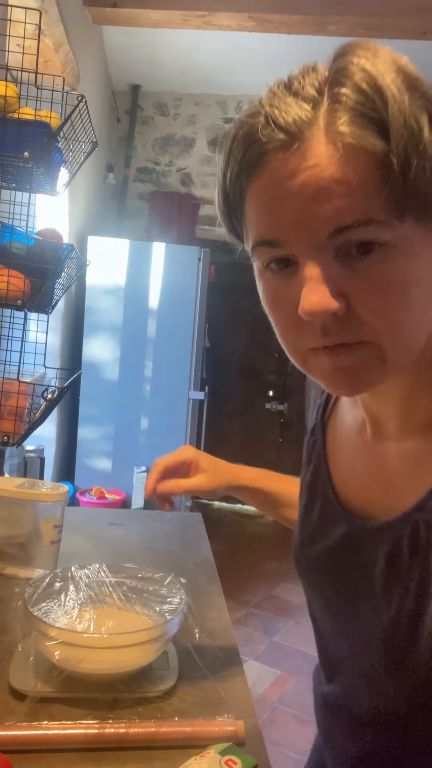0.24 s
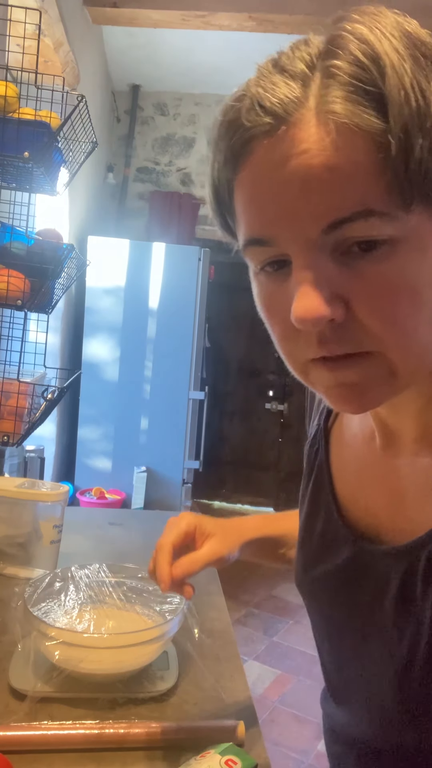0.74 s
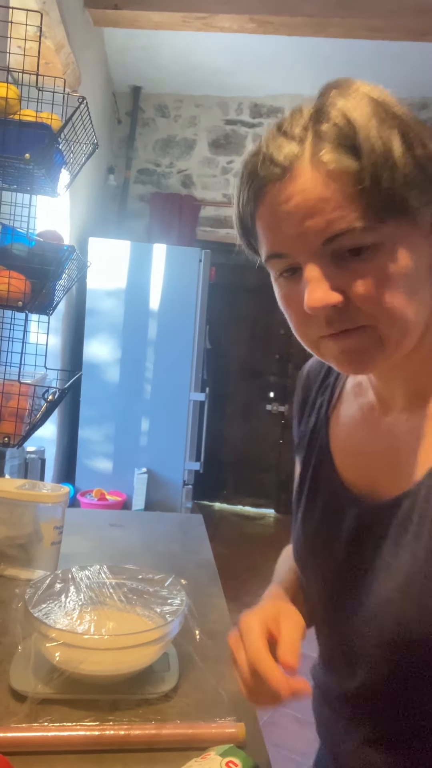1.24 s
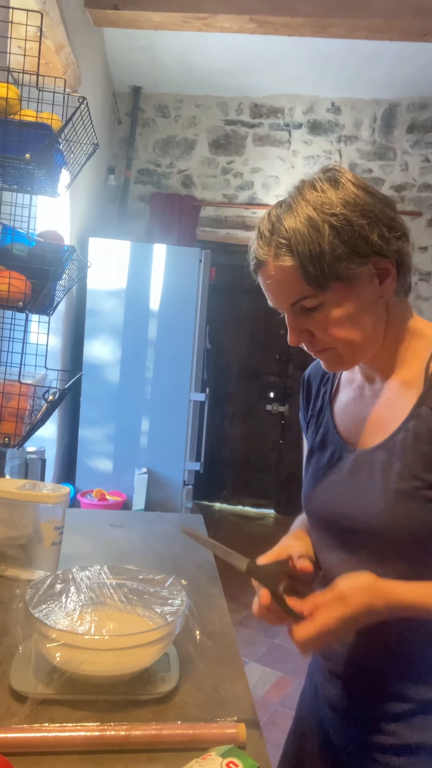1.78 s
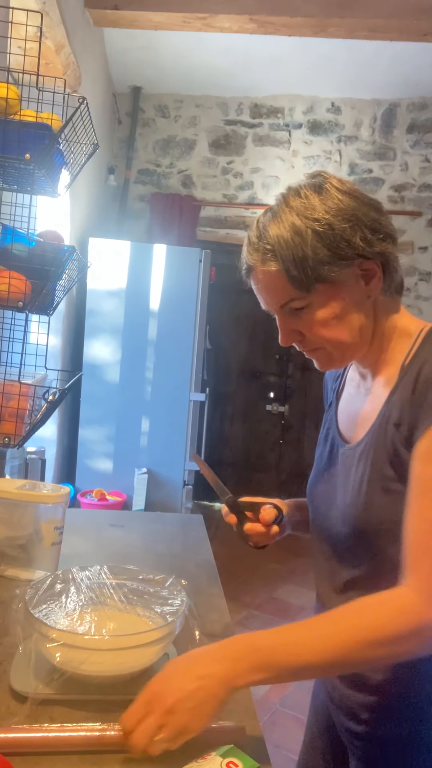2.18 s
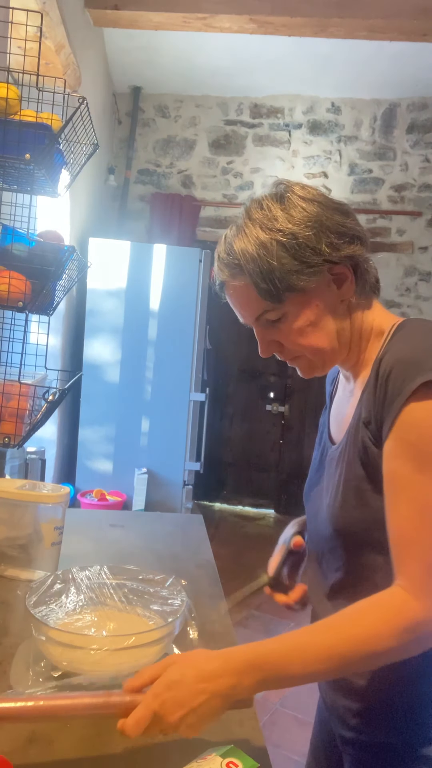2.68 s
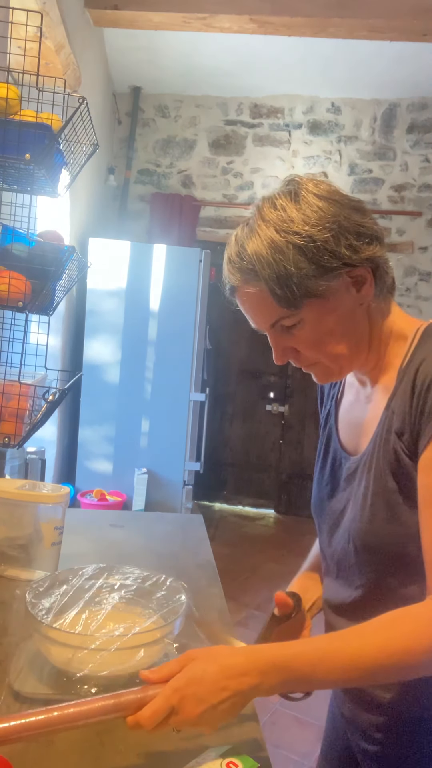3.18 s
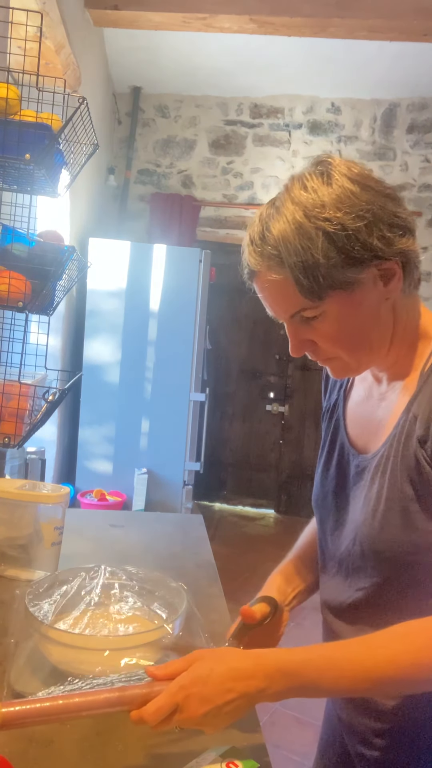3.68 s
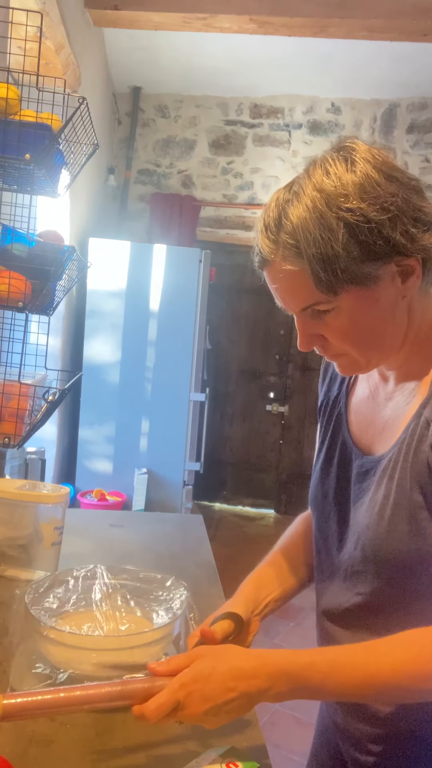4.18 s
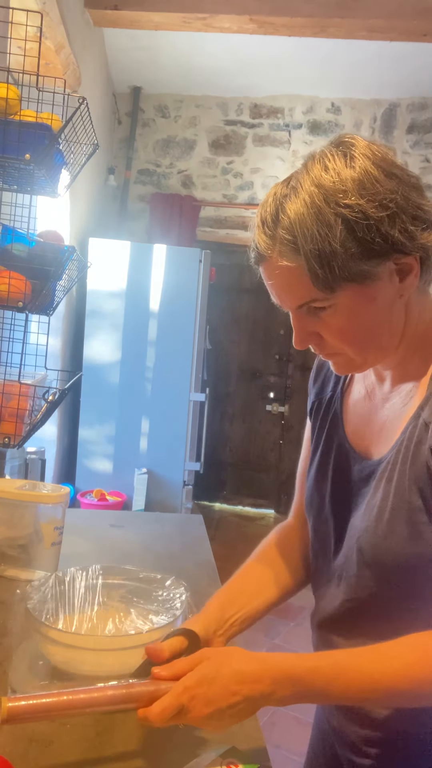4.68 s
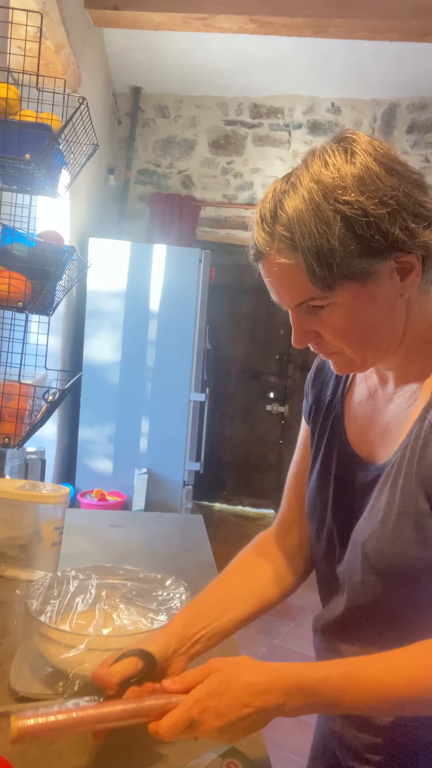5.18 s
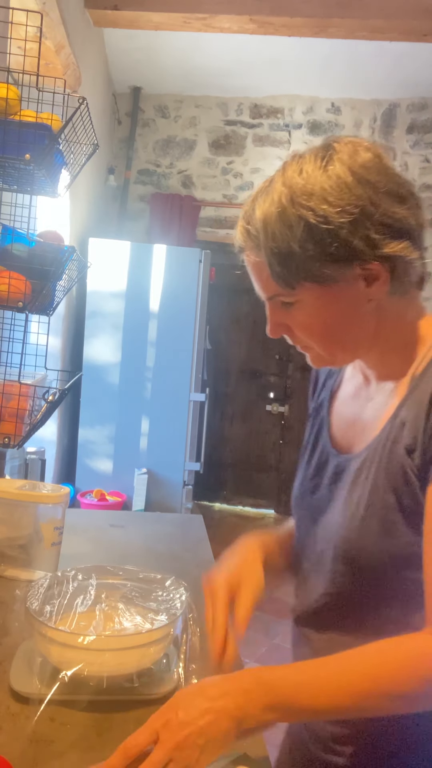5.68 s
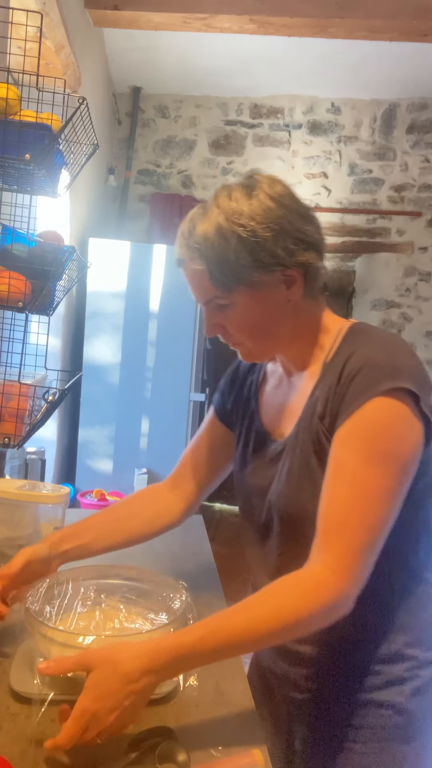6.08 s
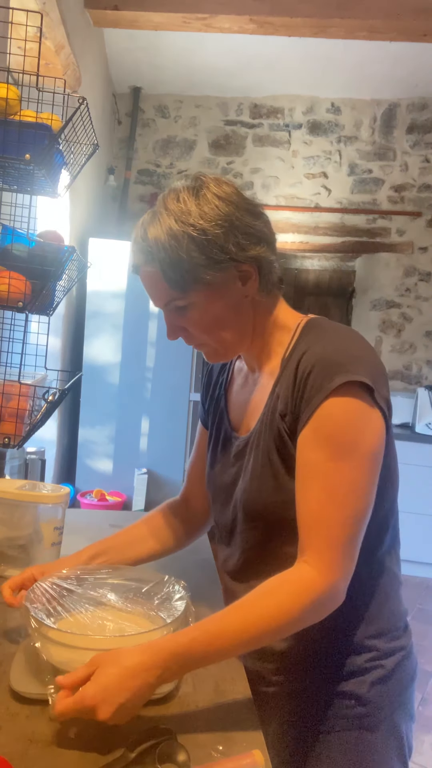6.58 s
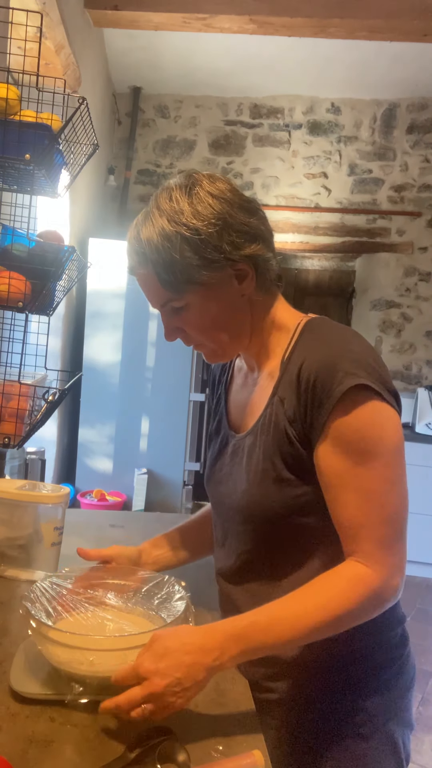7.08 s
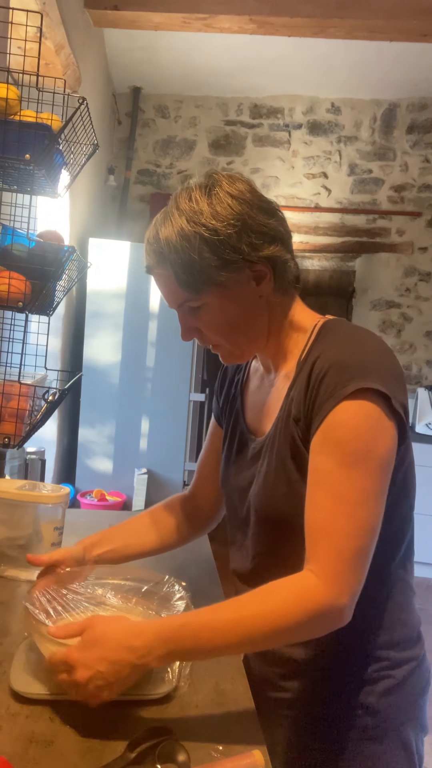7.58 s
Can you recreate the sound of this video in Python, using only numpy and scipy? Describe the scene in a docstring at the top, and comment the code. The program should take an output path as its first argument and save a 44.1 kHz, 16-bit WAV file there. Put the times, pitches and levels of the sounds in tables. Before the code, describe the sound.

A small stone-walled kitchen, heard close in stereo with short echo and a faint bass-heavy hush. From about 0.4 s a hollow roll knocks the worktop, building to hard, loud clacks and woody knocks at 0.65-0.95 s, then rattling out by 1.2 s. Faint film rustles begin near 1.5 s; a single sharp, bright blade crack comes at 2.0 s. From 2.3 to 2.8 s film crinkles and snaps with soft low bumps, with more light rustling at 3.3 s. Scissors cut crisply at about 3.7, 4.0, 4.4, 4.7, 4.9 and 5.1 s, each a short crackling bite and thinner reopening slide. At 5.35 s steel touches and rings briefly, then roll and scissors clatter densely from 5.45 to 6.0 s. Film rustles brightly, drawn over the bowl until 7.2 s, with tiny snaps and a last soft swell around 7.5 s.

```python
"""Hard things clatter twice on a worktop in a stone-walled kitchen: a hollow roll, then roll and scissors.
Between the clatters cling film rustles and crackles and scissors snip through it; more film follows.
Blows and a rocking rattle excite ringing bodies; film is a dense rain of tiny impacts plus single snaps.
A steel blade rings in decaying modes; soft bumps, low rumble and a quiet hush lie underneath.
Two microphones receive each sound with unlike phase and level, along with nearby reflections and room echo."""
import sys
import numpy as np
from scipy import signal
from scipy.fft import rfft, irfft, next_fast_len
from scipy.io import wavfile
from scipy.ndimage import uniform_filter1d

SR = 44100
rng = np.random.default_rng(int(sys.argv[2]) if len(sys.argv) > 2 else 0)


def materialize(psi):
    """Save the field psi as 16-bit PCM at rate SR to the path in sys.argv[1].

    A 1-D psi becomes a single channel; in a 2-D psi each row is a channel.
    """
    bounded = np.clip(np.atleast_2d(psi).T, -1, 1)
    quanta = np.round(bounded * 32767).astype(np.int16)
    wavfile.write(sys.argv[1], SR, quanta)


N = 345952
T = np.arange(N) / SR  # s
HZ = np.fft.rfftfreq(16384, 1 / SR) + 1e-3  # frequency grid for filter design

# spectral colour of cling film: (f/Hz, relative level/dB)
FILM_COLOUR = [(59, -39), (100, 3), (185, -2), (271, -14.5), (471, -7.5), (558, -17), (634, -9), (949, -10),
               (1280, -13.5), (1610, -8), (11400, -3), (16000, -5)]


def undb(db):
    """Decibels to gain."""
    return 10 ** (np.asarray(db) / 20)


def unit(x):
    """Scale to rms 1."""
    return x / np.sqrt(np.mean(x ** 2))


def on_log(table, hz):
    """Read (f/Hz, value) rows on a log-frequency axis."""
    f, v = np.transpose(table)
    return np.interp(np.log(hz), np.log(f), v)


def curve(table, count):
    """Gains over time from the first dB columns, 150 dB down outside the table."""
    s, *columns = np.transpose(table)
    return [undb(np.interp(T, s, c, left=-150, right=-150)) for c in columns[:count]]


def swell(s, length, db, rise, fall, sag=0.):
    """Gain that rises, holds for length seconds while sagging, and falls; slopes in dB per second."""
    t = T - s
    level = db - rise * np.maximum(-t, 0)
    level -= sag * np.clip(t, 0, length)
    level -= fall * np.maximum(t - length, 0)
    return undb(level)


def slope(lo_hz, hi_hz):
    """Gain of a steep-sided band."""
    return 1 / np.sqrt((1 + (lo_hz / HZ) ** 8) * (1 + (HZ / hi_hz) ** 8)) + 1e-5


def tilt(hz, octaves, rest=.5):
    """Broad hump around hz over an even rest."""
    return rest + np.exp(-.5 * (np.log2(HZ / hz) / octaves) ** 2)


def response(gain):
    """Causal impulse response of unit energy with this gain, from the folded cepstrum."""
    c = irfft(np.log(gain))
    half = len(c) // 2
    c[1:half] *= 2
    c[half + 1:] = 0
    h = irfft(np.exp(rfft(c)))[:half]
    return h / np.sqrt(np.sum(h ** 2))


def through(x, h):
    """Filter by an impulse response, keeping the length."""
    return signal.oaconvolve(x, h)[:len(x)]


def add(out, s, h, db):
    """Place a sound at time s with its peak at db."""
    i = int(s * SR)
    h = h[:N - i]
    out[i:i + len(h)] += h * undb(db) / np.max(np.abs(h))


def burst(h, contact_s, tick, rise_s):
    """A first touch and a ragged contact that builds and decays, ringing through h."""
    t = T[:1500]
    contact = np.exp(-t / contact_s) * (1 - np.exp(-t / rise_s))
    touch = tick * np.exp(-t / 0.0003)
    return signal.oaconvolve(rng.standard_normal(len(t)) * (contact + touch), h)


def grit(size, gain, tints_hz, rate, spread_db, hiss, patchy_db, puff_s=0.0028, ripple_db=1.5):
    """Tiny uneven impacts over a hiss; each tint has its own impacts and wandering level; rms 1."""
    out = 0
    for hz in tints_hz:
        strength = undb(np.minimum(spread_db * rng.exponential(size=size), 15))
        hit = (rng.random(size) < rate / SR) * strength  # rate in impacts per second
        puff = unit(signal.lfilter([1], [1, -np.exp(-1 / SR / puff_s)], hit))
        walk = np.repeat(rng.standard_normal(size // 900 + 1), 900)[:size]
        walk = uniform_filter1d(walk, size=900)
        # random uneven narrow colour: a new level every 130 Hz, above 700 Hz
        places = np.arange(0, SR / 2, 130)
        uneven = np.interp(HZ, places, rng.standard_normal(len(places)))
        ripple = undb(ripple_db * uneven * (HZ > 700))
        tinted = gain * tilt(hz, 0.63, 0.19) * ripple
        weight = np.sqrt(np.sum(tinted ** 2))
        grains = (puff + hiss) * undb(patchy_db * walk) * rng.standard_normal(size)
        out = out + weight * through(grains, response(tinted)[:4096])
    return unit(out)


def hush():
    """Faint steady kitchen noise: random noise filtered to a bass-heavy colour."""
    # colour of the quiet: (f/Hz, relative level/dB)
    quiet = [(18, -37.5), (30, -7.5), (103, -10.5), (199, -11.5), (233, -11), (400, -26.5), (600, -25.5),
             (1100, -32.5), (8730, -29.5), (16000, -34)]
    colour = undb(on_log(quiet, HZ))
    return unit(through(rng.standard_normal(N), response(colour))) * undb(-69.5)


def rattle(rocking, floor, modes, hollow, bands):
    """Things rock and roll on: streams of tiny impacts in treble, middle and bass excite the body."""
    high, mid, low = bands
    start, end = int(rocking[0][0] * SR), int(rocking[-1][0] * SR)
    size = end - start
    ringing = modes.sum(axis=0)
    # light rocking wakes the high modes less than a blow
    treble = grit(size, np.sqrt(floor + 0.15 * ringing) * high, (1800, 2600, 4000, 6000, 10200),
                  rate=260, spread_db=8.5, hiss=0.96, patchy_db=3, puff_s=0.0018, ripple_db=3.5)
    middle = grit(size, np.sqrt(floor + hollow * ringing) * mid, (450, 1000),
                  rate=70, spread_db=4.5, hiss=0.19, patchy_db=6, puff_s=0.0019, ripple_db=3.5)
    bass = grit(size, np.sqrt(floor + ringing) * low, (90,),
                rate=25, spread_db=4.5, hiss=1.2, patchy_db=2.5, puff_s=.008, ripple_db=1.5)
    out = np.zeros(N)
    trims_db = (-1.5, -4, -1.5)
    for x, level, db in zip((treble, middle, bass), curve(rocking, count=3), trims_db):
        out[start:end] += x * level[start:end] * undb(db)
    return out


def strikes(blows, rings, floor, modes, bands):
    """Each blow makes a bright clack, a hollow knock and a thud of the worktop through one body."""
    # contact decay times: (t/s, clack decay/s, knock decay/s)
    contact = [(0.3, 0.0038, 0.0045), (0.7, 0.0062, .006), (0.86, 0.004, .004), (1.2, 0.0034, 0.0035),
               (5.451, 0.0034, 0.0049), (5.6, 0.0027, .004), (5.86, 0.0019, 0.0026),
               (5.93, 0.00086, 0.0023)]
    # note of the hollow knock, moving as the roll turns and lies down: (t/s, f/Hz)
    hollow_note = [(0.3, 622), (1.3, 612), (5.34, 600), (5.46, 516), (5.64, 460), (5.7, 530), (5.77, 490),
                   (5.87, 440), (6.0, 423)]
    high, mid, low = bands
    times, *contacts = np.transpose(contact)
    mode_hz = np.array(rings)[:, 0]
    thud = response(np.sqrt(floor + modes.sum(axis=0)) * low)
    out = np.zeros(N)
    for s, clack_db, hz, knock_db in blows:
        # each blow gets random mode strengths, with a lift for those near its own colour
        near = 1 + undb(4) * np.exp(-.5 * (np.log2(mode_hz / hz) / .1) ** 2)
        scatter = undb(2 * 3.5 * rng.standard_normal(len(rings)))  # power gain, 3.5 dB deviation
        struck = np.sqrt(floor + near ** 2 * scatter @ modes)
        clack_s, knock_s = (np.interp(s, times, c) for c in contacts)
        note_hz = np.interp(s, *np.transpose(hollow_note))
        clack = response(struck * high * tilt(hz, .55, .4))[:4096]
        knock = response(struck * mid * tilt(note_hz, .15, 0.67))
        add(out, s, burst(clack, clack_s, 0.14, clack_s * .4), clack_db)
        add(out, s, burst(knock, knock_s, 0.43, 0.0012), knock_db)
        add(out, s, burst(thud, 0.0074, 0.2, 0.0012), knock_db - 12.5)
    return out


def clatter(rocking, rings, broad, hollow, blows):
    """Blows and a rocking rattle excite the same body: resonant modes over a broad colour."""
    floor = undb(2 * (on_log(broad, HZ) + 1))  # power, raised 1 dB
    modes = np.array([undb(2 * db) / (1 + (2 * (HZ - hz) / width) ** 2) for hz, width, db in rings])
    bands = slope(1500, 20000), slope(270, 1500), slope(58, 270)
    return rattle(rocking, floor, modes, hollow, bands) + strikes(blows, rings, floor, modes, bands)


def rustle_blend():
    """Tiny impacts over hiss make bright rustle, crinkle and body; returns a way to blend them."""
    colour = undb(on_log(FILM_COLOUR, HZ))
    bright = grit(N, colour * slope(2400, 17000), (4090, 7030, 9000, 14300),
                  rate=220, spread_db=1, hiss=1, patchy_db=2, puff_s=0.002)
    crinkle = grit(N, colour * slope(900, 3500) * tilt(1202, 0.15, 0.54), (1200, 2300),
                   rate=96, spread_db=2, hiss=1.3, patchy_db=2.5)
    body = grit(N, colour * slope(130, 820) * tilt(620, .12, 1), (560,),
                rate=160, spread_db=4, hiss=2.7, patchy_db=2.5)

    def blend(crinkle_db, body_db):
        """Add crinkle and body at levels against the bright rustle."""
        return bright + undb(crinkle_db) * crinkle + undb(body_db) * body
    return blend


def soft_rustles(blend):
    """Soft swells of film rustle, from handling and from the first slow scissor cuts."""
    # (t/s, length/s, rustle level/dB, crinkle against rustle/dB, body against rustle/dB)
    swells = [(1.528, 0.0085, -55.5, -13, -10.5), (1.618, 0.018, -59, -19, -20),
              (1.77, 0.11, -57.5, -32.5, -26), (1.895, 0.054, -55.5, -19, -30),
              (2.003, 0.069, -54, -25, -33), (2.304, 0.057, -56, -8, -3.5), (2.495, 0.02, -42, -15, -33),
              (2.598, 0.13, -56, -8.5, -21), (2.746, 0.065, -49.5, -8.5, -12), (2.815, 0.018, -56, -5, 4.5),
              (3.313, 0.054, -47.5, -7.5, -12), (3.458, 0.038, -59, -34, -18),
              (3.65, 0.013, -50.5, -11.5, -13), (4.308, 0.029, -63, -23.5, -26),
              (7.454, 0.16, -48.5, -17.5, -30)]
    out = np.zeros(N)
    for s, length, db, crinkle_db, body_db in swells:
        out += swell(s, length, db, rise=900, fall=319) * blend(crinkle_db, body_db)
    return out


def snaps():
    """Single snaps of film and blades: short noise bursts, each with its own patchy colour."""
    # (t/s, peak level/dB, colour f/Hz)
    snapped = [(1.528, -44.5, 5230), (1.925, -36, 8500), (1.9994, -25, 9400), (2.299, -48.5, 1700),
               (2.333, -35, 10600), (2.507, -36, 4300), (2.614, -35, 4500), (2.72, -26.5, 11400),
               (2.7556, -25.5, 13100), (2.772, -33, 11740), (3.6477, -37, 6310), (3.7273, -41, 5750),
               (3.756, -39, 12000), (4.038, -35.5, 5530), (4.0556, -26.5, 8200), (4.098, -37, 11000),
               (4.116, -42, 9000), (4.194, -37, 10960), (4.3798, -27, 8650), (4.662, -42, 4160),
               (4.932, -31.5, 12000), (4.9563, -24, 12100), (5.137, -28.5, 9460), (6.268, -38, 8100),
               (6.439, -50, 9000), (6.4577, -37, 9000), (6.523, -41, 13000), (6.594, -34, 12130),
               (6.62, -33.5, 13170), (6.677, -35, 1150), (6.6904, -36, 9570), (6.7068, -37.5, 9230),
               (6.779, -43, 9000), (6.799, -44.5, 10000), (6.813, -41, 8500), (6.84, -50, 7000),
               (6.901, -34, 9940), (6.904, -36, 6950), (6.93, -45.5, 12000), (7.4048, -53.5, 3600),
               (7.4694, -27.5, 11700), (7.5242, -29.5, 9700), (7.5996, -34, 12060)]
    colour = undb(on_log(FILM_COLOUR, HZ))
    out = np.zeros(N)
    for s, db, hz in snapped:
        ripple = np.interp(HZ, np.linspace(0, SR / 2, 40), rng.standard_normal(40))
        gain = colour * slope(1000, 25000) * tilt(hz, 0.28, 0.14) * undb(4 * ripple)
        add(out, s, burst(response(gain)[:1000], 0.0046, 2, 0.00051), db)
    return out


def crack():
    """One sharp crack of the blades: a bright click and its near echoes off the worktop."""
    # the crack: (t/s, peak level/dB)
    click = (1.9993, -10.5)
    # its echoes: (delay/s, level against the crack/dB)
    echoes = [(.0007, -11), (.0013, -7.5), (.0026, -13), (.0085, -22)]
    out = np.zeros(N)
    h = response(slope(2100, 25000) * tilt(10500, 0.66, 0.13))[:200]
    for later, db in [(0, 0)] + echoes:
        add(out, click[0] + later, h, click[1] + db)
    return out


def bumps():
    """Hand and roll bump softly on the worktop: brief contacts through a low, broad hump."""
    # (t/s, peak level/dB, f/Hz)
    bumped = [(2.324, -47.5, 205), (2.416, -58.5, 109.6), (2.822, -41, 190), (3.745, -55.5, 149),
              (4.04, -44.5, 129), (4.384, -51.5, 160), (7.47, -57.5, 399)]
    out = np.zeros(N)
    for s, db, hz in bumped:
        h = response(slope(hz / 2, 1900) * tilt(hz, 0.26, .08))
        add(out, s, burst(h, 0.0043, 0.18, 0.0023), db)
    return out


def rumble():
    """Steps and leaning on the worktop: swells of low-band noise."""
    # (t/s, length/s, level/dB)
    leans = [(2.385, .08, -60.5), (2.829, .02, -59), (4.052, 0.0202, -66), (6.847, .05, -75),
             (7.022, .06, -69), (7.509, .17, -67.5)]
    noise = unit(through(rng.standard_normal(N), response(slope(41, 120))))
    return noise * sum(swell(*row, rise=158, fall=174) for row in leans)


def cuts(blend):
    """Scissor blades slide in, bite through film and reopen; the sliding sounds are thinner."""
    # (t/s, cut length/s, rustle level/dB, wait until reopening/s,
    #  reopening, crinkle and body against rustle/dB)
    snips = [(3.73, 0.034, -41.5, 0.13, -13.5, -5.5, -8.5), (4.037, 0.081, -41.5, 0.16, -13.5, -6, -6),
             (4.373, 0.057, -42.5, 0.12, -13.5, -6, -10), (4.657, 0.075, -43, 0.15, -11.5, -6, -11),
             (4.937, 0.05, -38.5, 0.12, -16.5, -7.5, -11), (5.133, 0.014, -42, 0.049, -10.5, -6, -14)]
    rise, sag, fall = 2202, 60, 448  # dB per second
    thin_db = -9
    out = np.zeros(N)
    for s, length, db, wait, open_db, crinkle_db, body_db in snips:
        bite = swell(s, length, db, rise, fall, sag)
        slide = swell(s, 0, db - 11, rise=448, fall=rise)  # before the blades bite
        slide += (T > s) * swell(s + wait, 0.0187, db + open_db, rise=182, fall=356.5)
        out += bite * blend(crinkle_db, body_db)
        out += slide * blend(crinkle_db + thin_db, body_db + thin_db)
    return out


def blade():
    """A steel blade touches down and bounces: its modes ring and die away after each touch."""
    # touches: (t/s, peak level/dB)
    landings = [(5.344, -30.5), (5.368, -35)]
    # modes: (f/Hz, relative level/dB, 60 dB decay time/s)
    steel = [(1535, -7, .1), (1700, -1.5, 0.14), (1717, -0.5, 0.3), (2740, -20.5, 0.2), (4360, -10.5, .06)]
    out, t = np.zeros(N), T[:SR // 2]
    ring = sum(undb(db - 60 * t / t60) * np.sin(2 * np.pi * hz * t) for hz, db, t60 in steel)
    for s, peak_db in landings:
        add(out, s, ring, peak_db)
    return out


def stretch(blend):
    """Film is drawn over the bowl and smoothed down: a rustle of moving level and colour."""
    # (t/s, rustle level/dB, crinkle against rustle/dB, body against rustle/dB)
    drawn = [(6.09, -64, -13, 13), (6.16, -46, -8, 1), (6.31, -55, -23, -12), (6.45, -50.5, -11, -10),
             (6.54, -55.5, -11, -25), (6.67, -50, -6, -16), (6.93, -55, -12.5, -21.5),
             (7.08, -50, -13.5, -25), (7.19, -55, -23, -32), (7.28, -82.5, -9.5, -16)]
    s, _, crinkle_db, body_db = np.transpose(drawn)
    return curve(drawn, count=1)[0] * blend(np.interp(T, s, crinkle_db), np.interp(T, s, body_db))


def film():
    """Soft swells, cuts and stretching share one rustle; single snaps stand out from it."""
    blend = rustle_blend()
    return soft_rustles(blend) + snaps() + cuts(blend) + stretch(blend)


def ports(x, lead, balance):
    """A sound reaches the two microphones with unlike phase and level."""
    size = next_fast_len(N)
    hz = np.fft.rfftfreq(size, 1 / SR) + 1e-3
    phase = np.clip(on_log(lead, hz), -2.4, 2.4)  # radians
    half = undb(on_log(balance, hz) / 2) * np.exp(.5j * phase)
    pair = np.array([half, 1 / half])
    pair = pair / np.abs(pair.mean(axis=0))  # keeps the mid signal's level
    return irfft(rfft(x, size) * pair, size)[:, :N]


def room(x):
    """Diffuse echo, different at each microphone except in the bass; the treble dies sooner."""
    t60_s, treble_t60_s = 0.45, 0.34
    t = T[:SR // 2]
    noise = rng.standard_normal((2, len(t)))
    highpass = signal.butter(2, 378, "high", fs=SR, output="sos")
    apart = signal.sosfilt(highpass, noise[1] - noise[0])
    noise = np.array([noise[0], noise[0] + apart]) * (1 - np.exp(-t / 0.0024))
    low = signal.sosfilt(signal.butter(2, 2500, fs=SR, output="sos"), noise)
    h = low * undb(-60 * t / t60_s) + (noise - low) * undb(-3 - 60 * t / treble_t60_s)
    return np.array([through(x, k / np.sqrt(np.sum(k ** 2))) for k in h]) * undb(-4)


def nearby(x):
    """Reflections off things close by, opposite in the two microphones in the middle range."""
    h = rng.standard_normal(2000) * np.exp(-T[:2000] / .008)
    band = signal.butter(2, (700, 5000), "band", fs=SR, output="sos")
    h = signal.sosfilt(band, h / np.sqrt(np.sum(h ** 2)))
    return through(x, h) * undb(-6) * np.array([[1], [-1]])


def scene():
    """All sources, direct and through the room."""
    # blows on the worktop: (t/s, clack peak level/dB, clack colour f/Hz, knock peak level/dB)
    blow_rows = [(0.2798, -51.5, 3697, -54.5), (0.3971, -41.5, 3420, -35), (0.408, -45.5, 8080, -44.5),
                 (0.486, -44.5, 2991, -50), (0.5134, -36.5, 2555, -37.5), (0.5348, -26.5, 7200, -17.5),
                 (0.597, -20, 2979, -19), (0.6083, -20, 2478, -12), (0.6479, -1.5, 8044, -15.5),
                 (0.6575, -3.5, 2367, -4.5), (0.701, -5, 2711, 0), (0.7117, -12, 2605, -8.5),
                 (0.7394, -12, 2247, -26), (0.783, -22.5, 2694, -20), (0.833, -25, 4710, -22.5),
                 (0.848, -14, 3377, -30.5), (0.8646, -2, 4912, -21), (0.875, -11.5, 8070, -25),
                 (0.8944, -19.5, 2610, -12), (0.9282, -17, 2770, -22), (0.949, -4.5, 4840, -25.5),
                 (1.0256, -22, 2630, -21.5), (1.0882, -26.5, 2630, -18), (1.1325, -30, 4280, -37),
                 (1.196, -33, 3040, -34.5), (5.3446, -34, 2860, -20.5), (5.454, -3.5, 2980, -7),
                 (5.4818, -10.5, 5450, -37.5), (5.5053, -13, 8560, -14), (5.534, -10.5, 4150, -11),
                 (5.542, -13.5, 8260, -11), (5.555, -11, 7460, -17.5), (5.5976, 3.5, 9700, -22.5),
                 (5.635, -4.5, 6110, -12.5), (5.661, -16, 6140, -24.5), (5.676, -15, 2500, -9.5),
                 (5.6801, -6.5, 7990, -20.5), (5.7061, -13, 2320, -7), (5.7281, -14.5, 3704, -6.5),
                 (5.753, -17, 2008, -17), (5.7677, -10, 7530, -12.5), (5.782, -13.5, 4800, -15.5),
                 (5.7887, -12.5, 3900, -12.5), (5.806, -10, 1916, -11), (5.8141, -11.5, 4100, -9),
                 (5.847, -33.5, 9700, -32), (5.8653, -9, 6650, -4), (5.8787, -16, 2764, -16.5),
                 (5.935, -17.5, 6900, -20.5), (5.9826, -19, 6960, -10.5), (6.0131, -22, 6890, -20.5),
                 (6.0343, -31, 7200, -25), (6.067, -44, 7000, -30)]
    # rocking, one table per clatter: (t/s, treble, middle and bass level/dB before band trims)
    rockings = [
        [(0.0, -78.5, -51.5, -51.5), (0.216, -83.5, -89.5, -83), (0.396, -69, -46.5, -43),
         (0.554, -40, -38.5, -44), (0.718, -20.5, -14, -20.5), (0.792, -31, -30, -30), (0.88, -32, -30.5, -34),
         (0.914, -28, -19, -34.5), (1.016, -47, -45.5, -50.5), (1.06, -40, -28.5, -35), (1.222, -57, -44, -45),
         (1.644, -72.5, -74, -66), (1.9, -71, -89.5, -72)],
        [(5.33, -72, -73.5, -75), (5.35, -48, -36, -27), (5.436, -57.5, -66, -31.5), (5.466, -38.5, -34, -28),
         (5.55, -37, -37, -27.5), (5.59, -42, -32.5, -33), (5.628, -36, -28.5, -35), (5.69, -34.5, -28, -32),
         (5.758, -25, -25, -26), (5.872, -33, -23, -25), (5.93, -39.5, -32, -27), (6.06, -47, -43, -31.5),
         (6.2, -50, -43, -40), (6.382, -63.5, -58, -69), (6.6, -68, -79, -71)],
    ]
    # resonant modes, per clatter: (f/Hz, width/Hz, relative level/dB)
    ring_sets = [
        [(112, 3.5, -2), (185, 43, -16), (603, 12, -5), (626.8, 35, 1), (753, 90, -15), (1090, 90, -14.5),
         (1810, 32, -24), (2620, 200, -21), (3308, 49, -24), (4280, 250, -23), (4550, 93, -20.5),
         (6860, 320, -22.5), (8130, 300, -21), (9060, 440, -18.5)],
        [(90, 16, 6), (351, 17, -4), (425, 37, -4), (506, 64, -5), (740, 150, -6.5), (1230, 240, -6),
         (2030, 350, -7), (2660, 88, -20.5), (4030, 160, -10), (5600, 130, -29), (6300, 190, -15.5),
         (6700, 390, -23), (8430, 550, -21), (10430, 300, -22.5), (11470, 310, -16.5)],
    ]
    # broad colour under the modes, per clatter: (f/Hz, relative level/dB)
    broads = [
        [(29, -58), (50, -24), (175, -10), (252, -18.5), (558, -9.5), (615, -18), (1540, -18), (8130, -27),
         (16000, -31)],
        [(29, -38.5), (50, -23.5), (87, 10.5), (298, -5.5), (507, -2), (949, -12.5), (1180, -9.5),
         (8330, -22.5), (16000, -29)],
    ]
    # share of the middle modes in the rocking, one number per clatter (power ratio)
    hollows = (0.34, .2)
    # first clatter, second clatter, all else: (f/Hz, left lead/rad before limiting)
    leads = [
        [(30, 2.5), (300, 0.5), (520, 1), (1200, 2.5), (2400, 1.14), (5000, 2), (6500, 1.2), (20000, 0)],
        [(30, -0.5), (520, 1), (860, 2.5), (1700, 0.6), (2800, 2.0), (4300, 0.5), (6500, 0.4), (20000, 3.5)],
        [(30, 1), (500, 2.5), (1500, 1.4), (4000, 1.93), (6500, -2), (20000, -2)],
    ]
    # in the same order: (f/Hz, left minus right level/dB)
    balances = [
        [(30, 1), (350, -13), (700, -0.5), (2400, 2), (20000, -2.5)],
        [(30, -8), (150, -9.5), (300, -9.5), (600, -8.5), (1500, -1), (20000, 0.8)],
        [(30, -0.3), (1000, -0.36), (20000, -0.3)],
    ]
    blows = np.array(blow_rows)
    early = blows[:, 0] < 3
    blow_sets = (blows[early], blows[~early])
    clatters = zip(rockings, ring_sets, broads, hollows, blow_sets)
    quiet_bed = hush()
    first, second = (clatter(*parts) for parts in clatters)
    soft = quiet_bed + film() + crack() + bumps() + rumble()
    second = second + blade()
    direct = sum(ports(*parts) for parts in zip((first, second, soft), leads, balances))
    far = first + second + soft * undb(-4)  # soft rustle stirs the room less than blows
    return direct + room(far) + nearby(far)


def record(dry):
    """The treble is nearly the same in both channels; the loudest peaks are rounded and the top is cut."""
    mid, side = (dry[0] + dry[1]) / 2, (dry[0] - dry[1]) / 2
    low = signal.sosfiltfilt(signal.butter(4, 6300, fs=SR, output="sos"), side)
    side = low + .2 * (side - low)
    rounded = np.tanh(np.array([mid + side, mid - side]) * 0.71) / 0.91
    top_cut = signal.ellip(10, .2, 70, 15900, fs=SR, output="sos")
    return signal.sosfilt(top_cut, rounded)


dry = scene()
out = record(dry)
materialize(out)
```